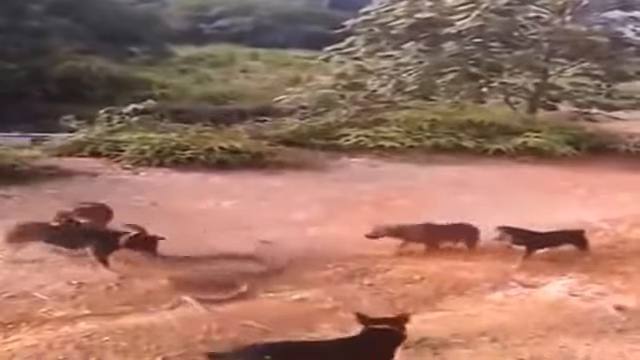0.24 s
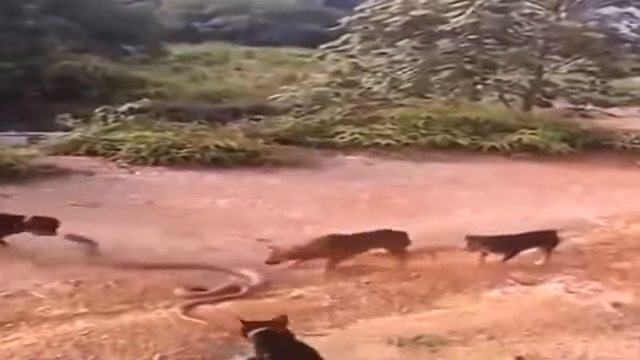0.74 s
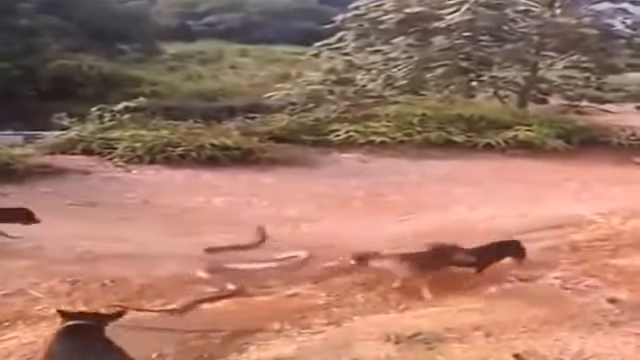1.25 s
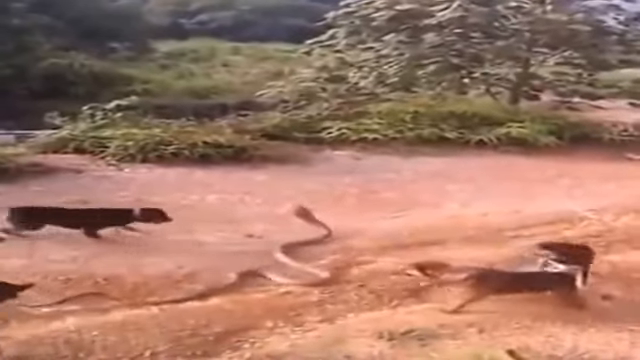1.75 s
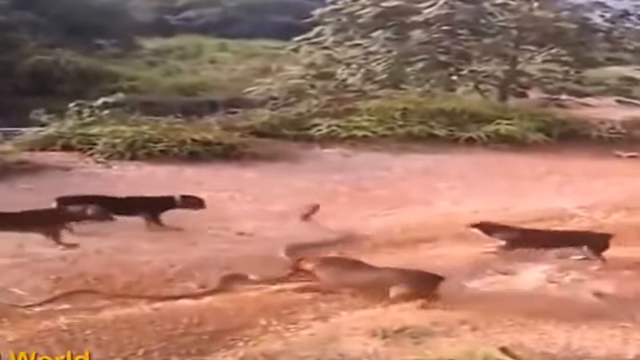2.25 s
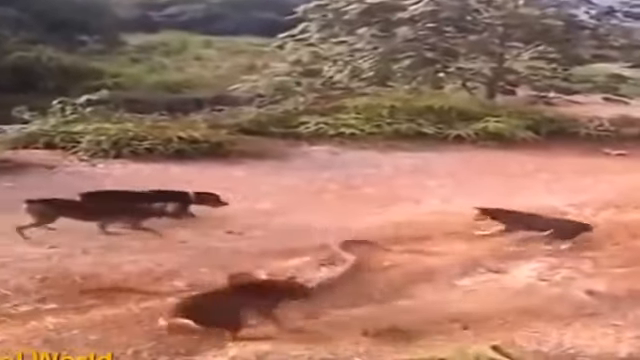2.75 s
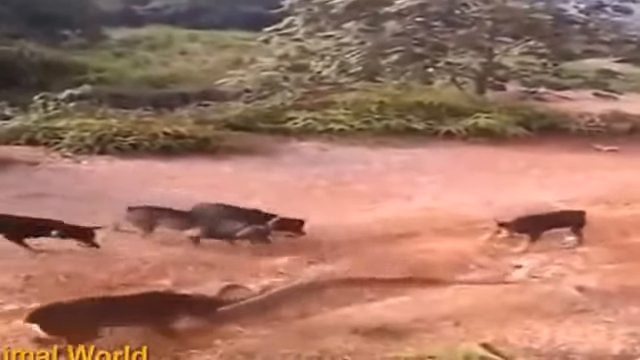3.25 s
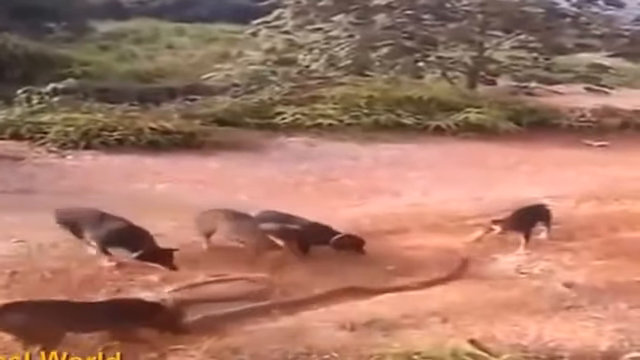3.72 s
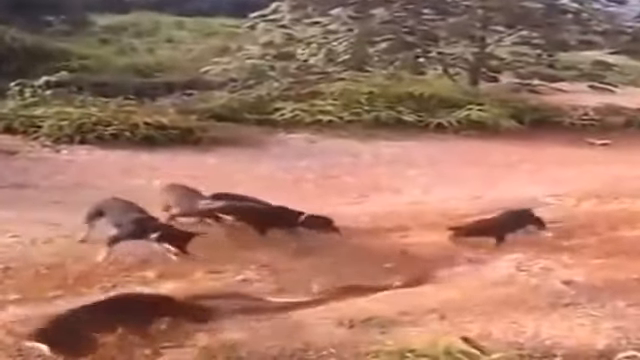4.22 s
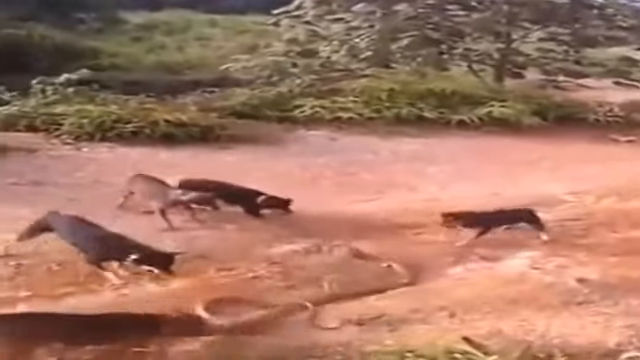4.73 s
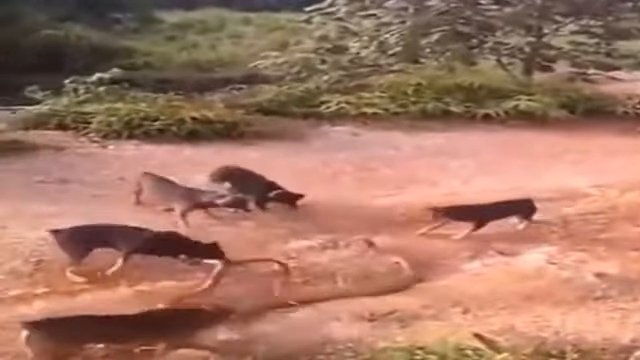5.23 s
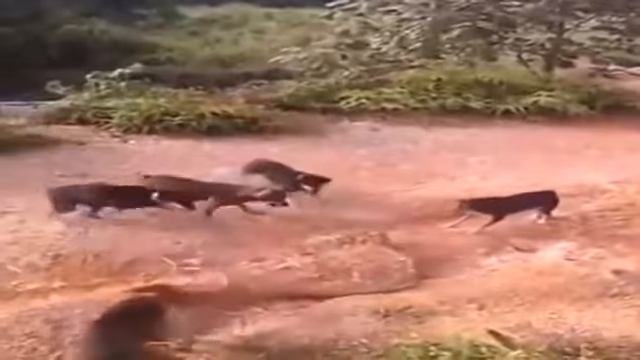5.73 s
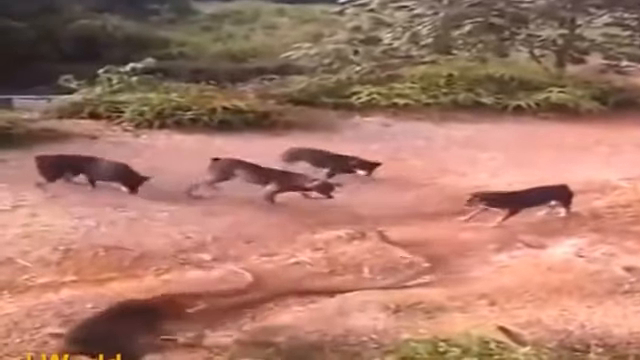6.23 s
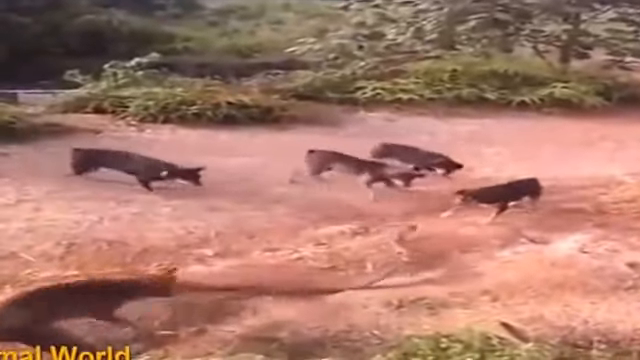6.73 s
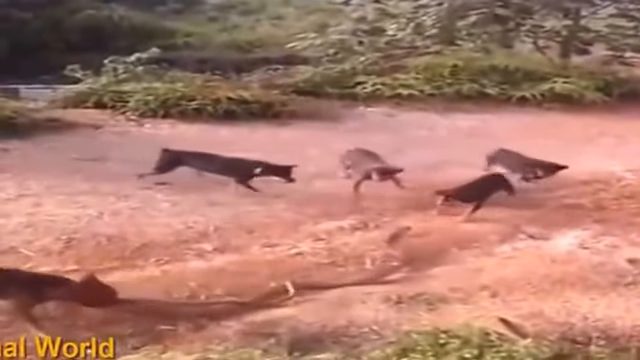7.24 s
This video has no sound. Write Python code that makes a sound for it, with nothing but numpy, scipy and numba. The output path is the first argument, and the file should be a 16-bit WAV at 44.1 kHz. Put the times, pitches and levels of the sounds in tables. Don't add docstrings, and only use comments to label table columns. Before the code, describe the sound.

Several dogs bark hard and hoarsely close by on open dirt, growing faster and overlapping, with far barking and hissing insects behind.

```python
import sys
import numpy as np
from scipy import signal
from scipy.fft import rfft, irfft
from scipy.io import wavfile
from scipy.ndimage import uniform_filter1d
from numba import njit

SR = 44100
rng = np.random.default_rng(int(sys.argv[2]) if len(sys.argv) > 2 else 0)


def elevation(decibels):
    levels = np.asarray(decibels, float)
    return 10 ** (levels / 20)


def master_out(mix):
    frames = np.transpose(np.atleast_2d(mix))
    ceiling = np.clip(frames, -1, 1)
    pcm = np.round(ceiling * 32767).astype(np.int16)
    wavfile.write(sys.argv[1], SR, pcm)


N = 329427


def level(x, db):
    return x * elevation(db) / np.sqrt(np.mean(x ** 2))


def effort(db):
    return db + 1.15 * np.clip(db + 13, 0, None)


@njit
def moving_resonance(x, hz, width_hz):
    y, b, l = np.empty(len(x)), 0., 0.
    for i in range(len(x)):
        g, k = np.tan(np.pi * hz[i] / SR), width_hz / hz[i]
        v = (b + g * (x[i] - l)) / (1 + g * (g + k))
        b, l, y[i] = 2 * v - b, l + 2 * g * v, k * v
    return y


@njit
def follow(x, attack, release):
    y, e = np.empty(len(x)), 0.
    for i in range(len(x)):
        e += (abs(x[i]) - e) * (attack if abs(x[i]) > e else release)
        y[i] = e
    return y


def walk(rate_hz):
    k = int(SR / rate_hz)
    steps = np.repeat(rng.standard_normal(N // k + 1), k)
    return 1.5 * uniform_filter1d(uniform_filter1d(steps, k), k)[:N]


def band(x, hz, width_hz):
    return signal.lfilter(*signal.iirpeak(min(hz, SR / 2.2), hz / width_hz, fs=SR), x)


def wash(spectrum, rate_hz, flicker_db):
    hz, db = np.transpose(spectrum)
    centres = hz[0] * 2 ** np.arange(0, np.log2(hz[-1] / hz[0]), 1 / 6)
    total = np.zeros(N)
    for f in centres:
        hiss = band(band(rng.standard_normal(N), f, f / 6), f, f / 6)
        colour_db = np.interp(np.log(f), np.log(hz), db)
        total += hiss * elevation(colour_db + flicker_db * walk(rate_hz))
    return level(total, 0)


LEAD_S, BURST_S, SNAP_S = 0.0085, 0.0063, 0.0041
LEAD_DB, SNAP_DB, RELEASE_DB = -5, -6, -15.5
RASP_DB = (-9, -16, -17, -11, -7.5, -6)


def gesture(bark, low_glide, high_glide, open_db, closed_db, rasp_db, sag_db, tail_s):
    start, length, db, low_hz, high_hz = bark
    closing = np.array([0, 0, 0, 1, 1, 1])
    times = start + np.array([-LEAD_S, 0, BURST_S, length, length + SNAP_S, length + tail_s])
    levels = db + np.array([LEAD_DB, LEAD_DB, 0, sag_db, sag_db + SNAP_DB, sag_db + RELEASE_DB])
    low = low_hz * (1 + low_glide * closing)
    high = high_hz * (1 + high_glide * (closing - .5))
    low_share = open_db + (closed_db - open_db) * closing
    return np.transpose([times, levels, low, high, low_share, rasp_db + np.array(RASP_DB)])


YAPS = [
    (-.012, 0.084, -13.5, 826, 2520),
    (1.264, 0.036, -16.5, 1220, 2180),
]
PANT = [
    (.395, 0.079, -18, 1030, 2450),
]
FADING = [
    (1.066, 0.1, -8, 950, 2330),
]
DULL = [
    (1.357, .047, -13, 980, 2220),
    (6.772, 0.1, -14, 980, 2300),
]
STEADY = [
    (1.496, 0.12, -7, 970, 2330),
    (2.129, .103, -9, 970, 2400),
    (3.123, 0.11, -8.5, 1083, 2360),
    (4.848, 0.11, -8, 1165, 2340),
    (6.456, 0.11, -10, 990, 2460),
]
SINKING = [
    (2.629, 0.11, -8.5, 1230, 2230),
    (3.527, 0.12, -8, 1136, 2140),
    (5.803, 0.14, -8.5, 1110, 2150),
    (6.308, 0.11, -7.5, 1294, 2470),
]
SHARP = [
    (2.832, 0.12, -8, 1327, 2354),
    (3.718, 0.11, -7.5, 1397, 2220),
    (4.39, 0.11, -9, 1270, 2250),
    (5.226, .094, -8, 1235, 1975),
    (5.521, 0.12, -7.5, 1130, 2327),
    (6.938, 0.11, -8, 1245, 2330),
]
RASPY = [
    (4.231, 0.099, -8.5, 808, 2273),
    (4.566, 0.15, -9.5, 1084, 2320),
    (7.098, 0.11, -9.5, 1120, 1890),
]
# (barks, low_glide_share, high_glide_share, low_share_open_db, low_share_closed_db,
# extra_rasp_db, sag_db, tail_s)
KINDS = [
    (SINKING, -0.16, 0.027, -3, 0, 0, -2.53, 0.022),
    (SHARP, -0.096, 0.035, -9, -2.5, 0, -2.44, 0.026),
    (STEADY, 0.033, 0, -3.5, -0.91, 0, -1.77, .024),
    (RASPY, .11, 0, -5, -2.6, 6.2, -2.8, 0.023),
    (DULL, 0.049, -0.063, -0.22, 0, -2.8, -.3, 0.0071),
    (YAPS, 0.083, -0.042, -0.5, -0.89, 3.2, -2.4, 0.028),
    (PANT, 0.087, .03, -6.5, -.5, 14, -3.5, .03),
    (FADING, -.12, -.06, -5, -1.3, 1.6, -4, 0.058),
]


def gestures():
    calls = [gesture(bark, *habit) for rows, *habit in KINDS for bark in rows]
    return sorted(calls, key=lambda call: call[0, 0])


def rasp(folds):
    total = np.zeros(N)
    for place in (.9, 1.08):
        hz = 5100 * (place + .05 * walk(14))
        narrow = moving_resonance(moving_resonance(folds, hz, 800.), hz, 1200.)
        total += narrow * elevation(3.5 * walk(30))
    return level(total, -3.5)


def barks(t, locked):
    calls = gestures()
    s, *columns = np.concatenate(calls).T
    db, low_hz, high_hz, low_db, rasp_db = (np.interp(t, s, c) for c in columns)
    sounding = sum((t >= call[0][0] - .009) & (t <= call[-1][0]) for call in calls) > 0

    fold_hz = 620 * (1 + .1 * walk(60) + .06 * walk(400))
    beats = np.diff(np.floor(np.cumsum(fold_hz / SR)), prepend=0)
    breath = .55 * rng.standard_normal(N)
    folds = level(beats * elevation(3 * rng.standard_normal(N)), 0) + breath

    low_hz = low_hz * (1 + .03 * walk(90))
    high_hz = high_hz * (1 + .035 * walk(150))
    low = level(moving_resonance(moving_resonance(folds, low_hz, 260.), low_hz, 400.), 0)
    high = level(moving_resonance(moving_resonance(folds, high_hz, 380.), high_hz, 520.), 0)
    share = np.clip(elevation(low_db), 0, .97)
    chest = level(band(folds, 480, 133), -19)
    voice = share * low + np.sqrt(1 - share ** 2) * high + chest

    total = elevation(effort(db)) ** 2
    chaos = np.sqrt(np.maximum(total - 1.8 * locked, .06 * total))
    hiss = level(band(band(rng.standard_normal(N), 5150, 2200), 6600, 7000), -9.5)
    air = (rasp(folds) + hiss) * elevation(rasp_db) * np.sqrt(total)
    mouth = follow(1. * sounding, 1 / (.009 * SR), 1 / (.02 * SR)) ** 2
    return (voice * chaos + air) * mouth


# (pitch_hz, level_db per Hz)
INSECTS = [(1940, -35), (3300, -21), (3700, -27), (4150, -12), (4560, 8.5), (5690, 2), (7520, -16.5),
           (8590, -14.5), (9330, -23.5), (13400, -19.5), (15000, -18)]


def insects(far_db):
    return wash(INSECTS, rate_hz=35, flicker_db=2.8) * elevation(-36.5 + 0.44 * (far_db + 37))


# (pitch_hz, level_db per Hz)
FAR = [(35, -52.5), (60, -44.5), (269, -2), (581, 0), (657, -6), (768, 1), (1030, -1), (1550, -3),
       (1750, -5), (2430, -0.5), (3050, -8.5), (3900, -4.5), (5070, -61), (8580, -120)]


def far_dogs(far_db):
    return wash(FAR, rate_hz=22, flicker_db=3) * elevation(far_db)


def breeze():
    return level(band(rng.standard_normal(N), 73, 130) * elevation(4.2 * walk(25)), -63.5)


# (time_s, far_dogs_db)
YARD = [(0.0, -29), (1.06, -40), (1.46, -28.5), (1.85, -38.5), (2.64, -40), (2.81, -26.5), (2.97, -29.5),
        (3.53, -39), (3.7, -24.5), (3.99, -35.5), (4.24, -38.5), (4.47, -26.5), (5.12, -35.5),
        (5.76, -30.5), (6.05, -38), (6.87, -34.5), (7.01, -22), (7.47, -40)]


def yard(t):
    far_db = np.interp(t, *np.transpose(YARD))
    return far_dogs(far_db) + insects(far_db) + breeze()


# (delay_s, level_db)
ECHOES = [
    (.01, -14),
    (0.033, -24.5),
    (0.069, -29.5),
    (0.117, -29),
    (.17, -30.5),
    (0.241, -53),
]


def bushes(x):
    tail = np.zeros(int(.4 * SR))
    s = np.arange(len(tail)) / SR
    for lag, db in ECHOES:
        fade = (s > lag) * np.exp(-np.abs(s - lag) / 0.013)
        tail += elevation(db) * fade / np.sqrt(0.023 * SR / 2)
    echo = signal.fftconvolve(x, tail * rng.standard_normal(len(tail)))[:N]
    return band(echo, 890, 6200)


WHINES = [(.03, .081, 480, 444, -20), (.629, .7, 662, 570, -33), (1.16, 1.435, 480, 448, -32.5),
          (2.612, 2.673, 439, 480, -23), (3.035, 3.133, 419, 506, -26.5), (4.019, 4.077, 401, 438, -31),
          (4.372, 4.382, 500, 563, -21), (4.54, 4.591, 480, 592, -23), (4.73, 4.776, 523, 430, -26),
          (4.824, 4.86, 417, 570, -18.5), (5.635, 5.666, 562, 500, -21.5),
          (6.624, 6.774, 357.4, 413.5, -31.5), (6.759, 6.828, 473, 493, -22.5)]
SHRIEKS = [
    (.048, .09, 1045, 1056, -26),
    (.649, .664, 914, 850, -32),
    (2.88, 2.949, 1288, 1302, -20.5),
    (3.762, 3.783, 1019, 1021, -8),
    (5.52, 5.566, 1021, 974, -10),
    (5.572, 5.609, 866, 815, -8.5),
]
YELPS = [(1.356, 1.409, 1100, 1030, -15), (6.79, 6.895, 1000, 1200, -18), (.092, .15, 1206, 1062, -29),
         (.225, .33, 1150, 1300, -41), (5.455, 5.49, 1000, 990, -32.5), (1.099, 1.174, 792, 796, -15),
         (2.129, 2.21, 708, 691, -20), (2.201, 2.227, 1020, 1065, -11), (3.604, 3.638, 1062, 954, -10),
         (4.218, 4.301, 708.5, 706, -21), (4.637, 4.677, 1077, 1042, -12.5), (5.301, 5.318, 1092, 936, -10),
         (5.831, 5.924, 1003, 1054, -9.5), (6.487, 6.555, 990, 1066, -9.5)]
CHEST = [(.437, .478, 559, 614, -24), (1.55, 1.61, 553, 605, -10), (2.708, 2.733, 528, 583, -11.5),
         (2.903, 2.933, 634, 595, -9.5), (3.12, 3.159, 572, 579, -11), (3.16, 3.229, 616.4, 561.4, -10.5),
         (3.536, 3.55, 554, 592, -9.5), (3.735, 3.757, 623, 707, -33), (3.786, 3.818, 635, 613, -23),
         (4.481, 4.499, 623, 630, -9), (4.567, 4.634, 620, 620, -11), (4.723, 4.736, 574, 585, -8.5),
         (4.856, 4.873, 565.5, 620, -8.5), (4.929, 4.961, 555, 558, -11.5), (5.807, 5.827, 620, 578, -10.5),
         (6.311, 6.338, 602, 640, -8.5), (6.36, 6.416, 620, 547, -14), (7.1, 7.114, 640, 620, -9.5),
         (7.11, 7.196, 542, 609.5, -11)]
CHIRPS = [
    (1.998, 2.02, 4600, 4450, -36),
    (2.48, 2.51, 5250, 5150, -38),
    (2.324, 2.341, 3780, 3740, -34.5),
    (2.42, 2.442, 4370, 4490, -34),
    (2.525, 2.543, 3760, 3770, -35),
    (.69, .76, 4450, 4400, -38),
    (6.772, 6.79, 5020, 4850, -22.5),
]
HALF_OPEN = [
    (2.638, 2.704, 640, 685, -11),
    (3.549, 3.59, 645, 698, -10),
    (6.951, 7.034, 946, 930, -10.5),
    (2.857, 2.897, 1057, 1027, -10),
]
OPEN = [
    (4.455, 4.469, 608, 562, -9),
    (4.686, 4.722, 535.4, 603, -9.5),
    (4.868, 4.928, 599, 521, -9.5),
    (5.231, 5.295, 666.5, 683.7, -10.5),
    (6.33, 6.352, 900, 928, -12.5),
]
REGISTERS = [
    (CHEST, 2.215),
    (HALF_OPEN, 2.39),
    (OPEN, 2.73),
    (SHRIEKS, 2.08),
    (YELPS, 1.03),
    (WHINES, 1.04),
    (CHIRPS, 0.91),
]
# (start_s, end_s, roughness 0-1)
HOARSE = [(.08, .35, .8), (1.34, 1.42, .5), (6.78, 6.9, .5), (1.09, 1.18, .6), (2.12, 2.24, .7),
          (2.7, 2.75, .7), (3.1, 3.24, .8), (3.59, 3.65, .4), (4.2, 4.31, .6), (4.56, 4.75, .6),
          (4.86, 4.98, .4), (5.52, 5.56, .6), (5.8, 5.94, .65), (1.54, 1.62, .3), (6.3, 6.57, .65),
          (6.9, 7.21, .7)]


def clear_spells(t):
    out, power = np.zeros(N), np.zeros(N)
    wobble, flutter = walk(130), walk(150)
    rough = sum(r * ((t > a) & (t < b)) for a, b, r in HOARSE)
    second = np.sin(2 * np.pi * np.cumsum(170 * (1 + 0.35 * walk(40))) / SR)
    partial = np.arange(1, 9)[:, None]
    spells = [(*row, multiple * (row[2] + row[3]) / 2) for rows, multiple in REGISTERS for row in rows]
    for start, end, first_hz, last_hz, db, peak_hz in spells:
        part = slice(max(int((start - .005) * SR), 0), int((end + .005) * SR))
        s = t[part]
        slack = 8 if peak_hz < 690 else 1 + 3 * rough[part]
        hz = np.interp(s, [start, end], [first_hz, last_hz]) * (1 + .006 * slack * wobble[part])

        near_peak = 1 / (1 + ((partial * hz - peak_hz) / 290) ** 2)
        overtones = .1 * np.exp(-partial * hz / 3500) * (partial > 1)
        weight = (near_peak + overtones) * (partial * hz < SR / 6)
        tone = np.sum(weight * np.sin(partial * 2 * np.pi * np.cumsum(hz) / SR), axis=0)
        tone *= 1 + .9 * rough[part] * second[part]
        tone *= elevation(1.3 * np.sqrt(slack) * flutter[part])

        fade = np.clip(np.minimum(s - s[0], s[-1] - s) / .007, 0, 1)
        shape = fade * elevation(effort(db))
        out[part] += level(tone, 0) * shape
        power[part] += shape ** 2 * (1 - .5 * rough[part])
    return out, power


# (first_slap_s, end_s, slaps_hz, depth_db)
THROBS = [
    (.395, .48, 85, 3),
    (1.358, 1.41, 90, 6),
    (2.165, 2.21, 23, 4.5),
    (6.835, 6.87, 42, 7),
    (6.875, 6.895, 80, 6),
]


def throb(t):
    db = np.zeros(N)
    for start, end, hz, depth_db in THROBS:
        active = (t > start - .17 / hz) & (t < end)
        db += depth_db * (np.cos(2 * np.pi * hz * (t - start)) - .5) * active
    return elevation(uniform_filter1d(db, size=60))


def scene():
    t = np.arange(N) / SR
    clear, locked = clear_spells(t)
    dogs = (clear + barks(t, locked)) * throb(t)
    return (dogs + bushes(dogs) + yard(t))[None]


def band_limit(x):
    return signal.sosfilt(signal.butter(12, 15670, fs=SR, output="sos"), x)


def record(dry):
    ceiling, step_hz, top_hz = .7, 8900, 15000
    hot = dry[0] / ceiling + 0.005
    hot = ceiling * (hot / (1 + hot ** 4) ** .25 - .015)
    hot = hot / (1 + .5 * follow(hot, 1 / (.08 * SR), 1 / (.1 * SR)))
    hz = np.fft.rfftfreq(N, 1 / SR)
    bass = np.sqrt((hz ** 2 + 90 ** 2) / (hz ** 2 + 250 ** 2)) * hz / np.hypot(hz, 18)
    treble = elevation((hz > step_hz) * (-6.0 + 8.4 * (hz - step_hz) / 6000)) * (hz < top_hz)
    mix = irfft(rfft(hot) * bass * treble, N)
    return band_limit(mix[None])


dry = scene()
out = record(dry)
master_out(out)
```